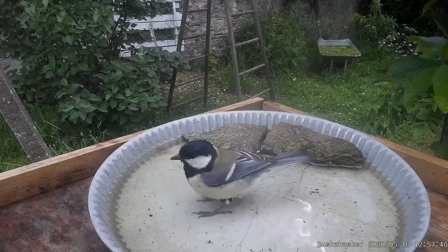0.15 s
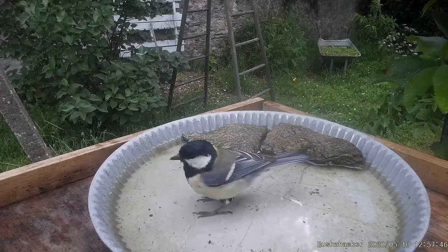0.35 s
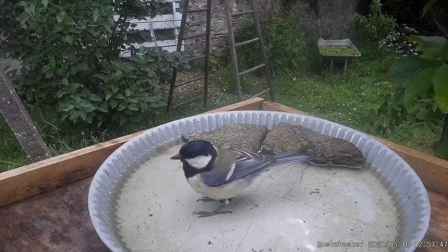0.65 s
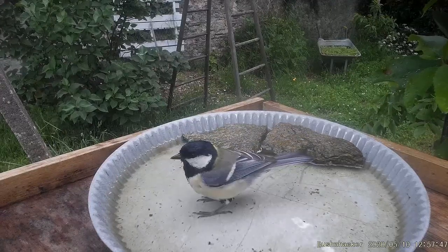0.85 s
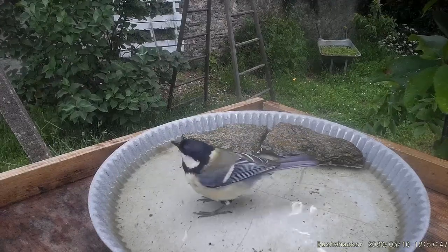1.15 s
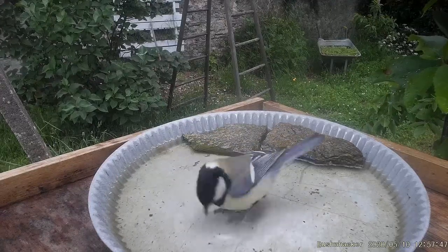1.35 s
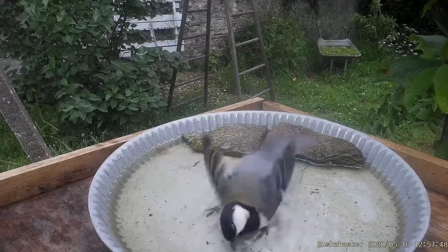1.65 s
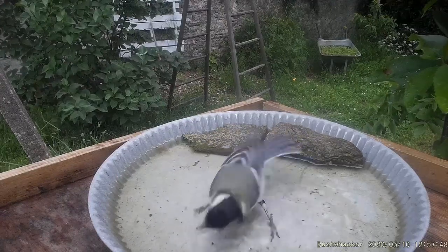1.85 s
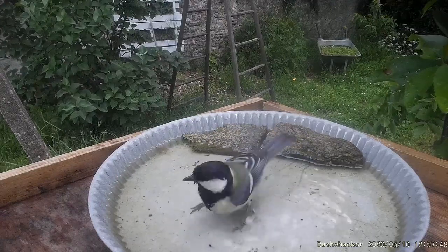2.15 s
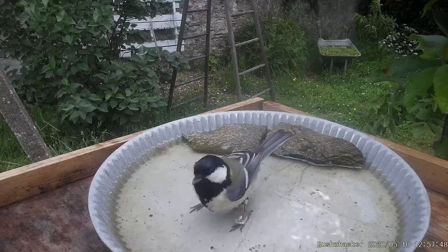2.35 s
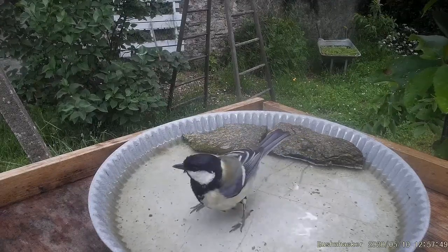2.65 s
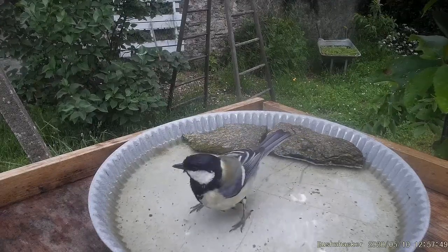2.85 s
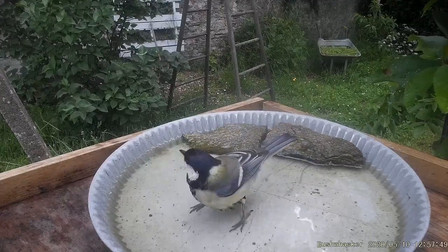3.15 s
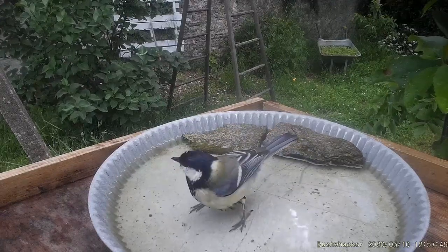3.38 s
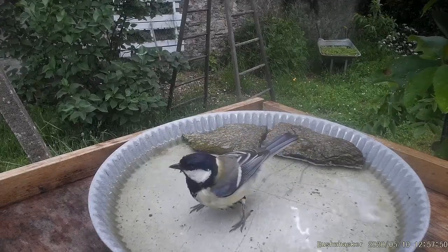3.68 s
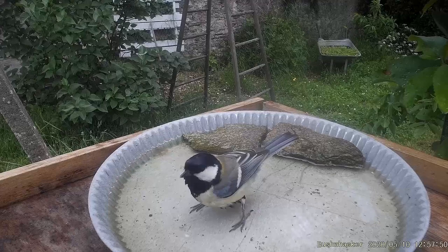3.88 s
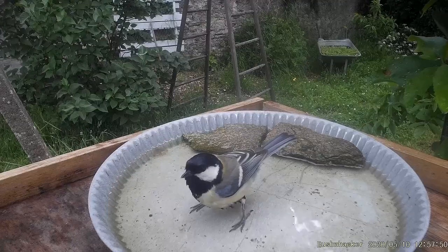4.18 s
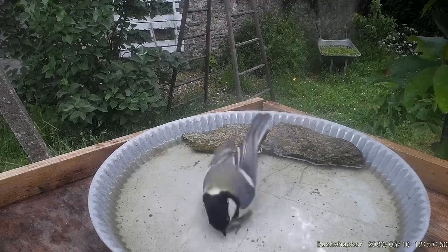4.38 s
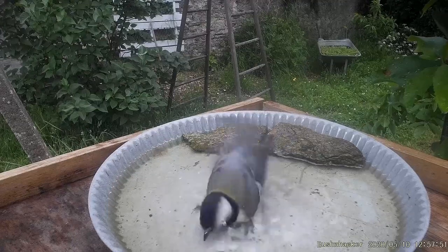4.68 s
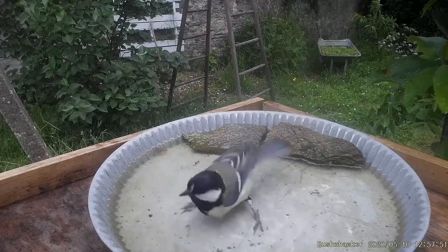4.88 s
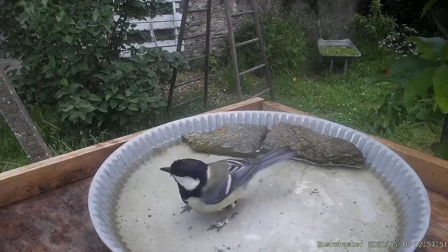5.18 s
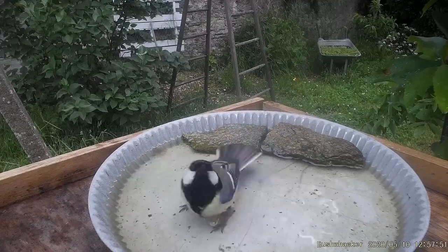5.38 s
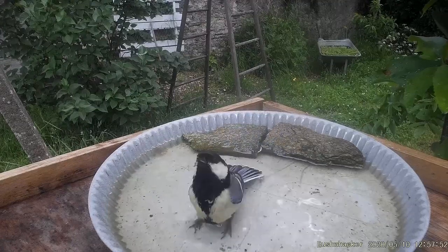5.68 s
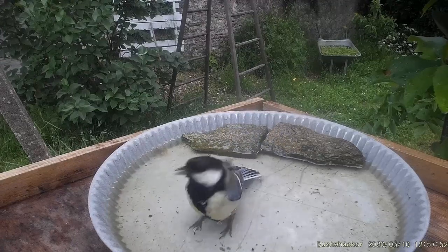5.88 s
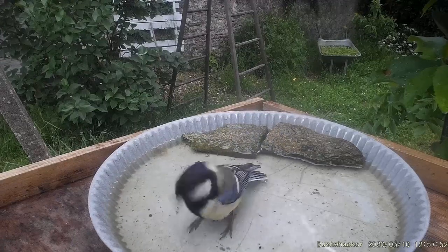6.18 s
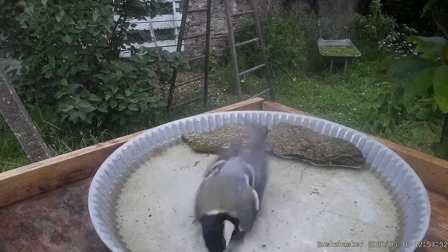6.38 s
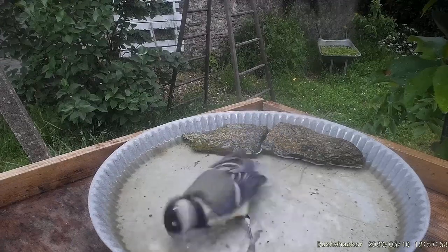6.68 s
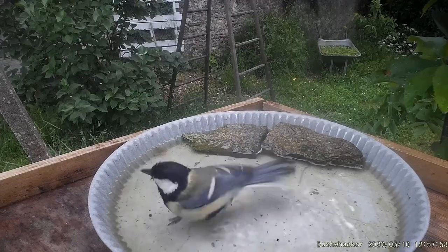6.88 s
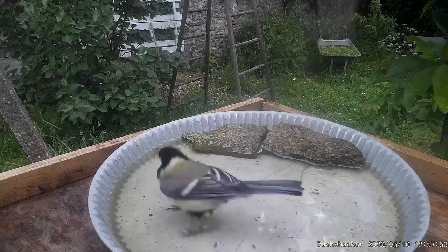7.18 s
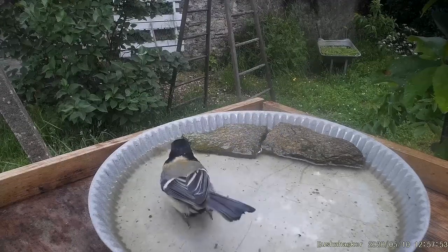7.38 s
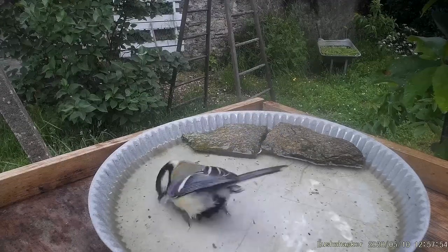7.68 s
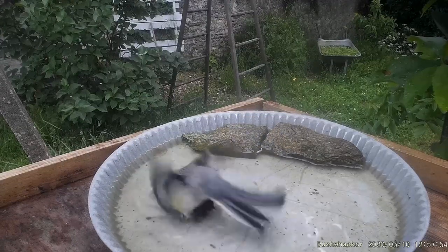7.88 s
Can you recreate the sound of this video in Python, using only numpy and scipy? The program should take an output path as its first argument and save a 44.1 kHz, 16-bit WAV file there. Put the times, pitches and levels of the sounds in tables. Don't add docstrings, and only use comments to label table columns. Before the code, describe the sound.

A small bird bathes close by, claws scraping and ringing a shallow dish, feet slapping water, wet wings spraying, faint birds calling far off.

```python
import sys
import numpy as np
from scipy import signal
from scipy.fft import rfft, irfft
from scipy.io import wavfile
from scipy.ndimage import uniform_filter1d

SR = 44100
rng = np.random.default_rng(int(sys.argv[2]) if len(sys.argv) > 2 else 0)


def materialize(psi):
    bounded = np.clip(np.atleast_2d(psi).T, -1, 1)
    quanta = np.round(bounded * 32767).astype(np.int16)
    wavfile.write(sys.argv[1], SR, quanta)


def invert_db(x):
    u = np.asarray(x, float) / 20
    return 10 ** u


N = 354563


def evened(x):
    return x / np.sqrt(np.mean(x ** 2) + 1e-20)


def peaked(x):
    return x / (abs(x).max() + 1e-20)


def add(mix, s, sound):
    part = mix[round(s * SR):][:len(sound)]
    part += sound[:len(part)]


def curve(tables, col):
    t, out = np.arange(N) / SR, np.zeros(N)
    for rows in tables:
        rows = np.array(rows)
        inside = (t >= rows[0, 0]) * (t < rows[-1, 0])
        out += invert_db(np.interp(t, rows[:, 0], rows[:, col])) * inside
    return uniform_filter1d(out, size=300)


def resonate(x, hz, width):
    r = np.exp(-np.pi * width / SR)
    return 2 * signal.lfilter([1 - r], [1, -r * np.exp(2j * np.pi * hz / SR)], x).real


def colour(x, points):
    hz, db = np.transpose(points)
    f = np.fft.rfftfreq(len(x), 1 / SR) + 1
    gain = invert_db(np.interp(np.log(f), np.log(hz), db))
    return evened(irfft(rfft(x) * gain, len(x)))


def high(x, hz):
    return signal.sosfilt(signal.butter(2, hz, "high", fs=SR, output="sos"), x)


def bursts(count):
    return np.arange(6000) / SR, rng.standard_normal((count, 6000))


def swells(rows):
    noise = rng.standard_normal((len(rows), 2600))
    u = np.arange(2600) / SR / np.array(rows)[:, 1:2]
    return noise * np.sin(np.pi * np.minimum(u, 1) ** 0.62) ** 2.5


def dying(t, t60, rise):
    return (1 - np.exp(-t / rise)) * invert_db(-60 * t / max(t60, .002))


def held(t, t60, hold):
    return dying(t, t60, 0.0016) / (1 + (t / hold) ** 6)


def mode(t, hz, t60, rise):
    return peaked(np.sin(2 * np.pi * hz * t) * dying(t, t60, rise))


def wander(hz):
    return evened(resonate(rng.standard_normal(N), hz, 1.19 * hz))


def echoes(x, t60):
    t = np.arange(round(.4 * SR)) / SR
    sparse = rng.choice([-1., 1.], len(t)) * (rng.random(len(t)) < .05)
    taps = sparse * invert_db(-60 * t / t60) * (t > .004)
    return signal.oaconvolve(x, taps / np.linalg.norm(taps))[:N]


# (pitch [Hz], width [Hz], level [dB])
DISH = [(1755, 77, -6), (2460, 36, -12.5), (3060, 17, -12.5), (3264, 134, -5), (3440, 39, -6),
        (4030, 13, -31.5), (4290, 42, -14.5), (5080, 140, -16), (4580, 270, -6), (5780, 930, -0.5),
        (6150, 37, -17), (6870, 54, -11), (7800, 250, -7.5), (8100, 120, -6.5)]
DISH_OCTAVES = np.log2(np.array(DISH)[:, 0] / 1800)


def dish(x, spot_db):
    shifts = 1 + 0.015 * rng.standard_normal(len(DISH))
    modes = 0
    for k, (hz, width, db) in enumerate(DISH):
        ringing = resonate(x, hz * shifts[k], 2.58 * width) / np.sqrt(width / 60)
        modes = modes + (-1) ** k * invert_db(db + spot_db[k]) * ringing
    return evened(modes) + 0.5 * evened(resonate(high(x, 490), 3100, 3500))


# (time [s], peak [dB], lowest dish ring [dB], rim squeak [dB re peak])
CLAWS = [(0.3735, -34, -60, -22), (0.385, -18.5, -53, -17), (0.4209, -12, -29, -28),
         (0.4314, -20, -29.5, -16), (0.4445, -24, -51, -8), (0.463, -21, -59, -7), (0.4802, -40, -69, 8),
         (1.3374, -37, -42, -30), (3.4092, -26.5, -56.5, -32), (3.4264, -32, -48.5, -8),
         (3.4545, -22.5, -45, -25), (3.4805, -25, -41.5, -28), (3.5006, -18.5, -32.5, -18),
         (3.5154, -18.5, -37, -7), (3.5224, -24, -36.5, -7), (3.5482, -23, -56, -32),
         (3.5535, -8.5, -37, -43), (3.5644, -17, -33, -3), (3.6117, -33.5, -51, -22),
         (3.6541, -38, -53, -18), (3.696, -34.5, -58.5, -22), (3.7589, -43, -54.5, -28),
         (4.0614, -31.5, -64, -21), (4.0774, -33, -66, -8), (4.0894, -42, -56, -15),
         (4.1305, -45, -48, -19), (4.9197, -35, -49, -15), (4.9344, -41, -45.5, -25)]
CLAWS_AND_BEAK = CLAWS + [(4.955, -20.5, -36, -12), (4.963, -20, -31, 6.5), (4.979, -28.5, -34, -13)]


def claws():
    out, (t, noise) = np.zeros(N), bursts(count=len(CLAWS_AND_BEAK))
    spots_db = 4.0 * rng.standard_normal((len(noise), len(DISH)))
    for (s, db, _, squeak_db), n, spot_db in zip(CLAWS_AND_BEAK, noise, spots_db):
        scratch = n * dying(t, 0.026, 0.00012)
        squeak = 1.3 * resonate(scratch, 8050, 600)
        squeak += .6 * resonate(scratch, 6600, 900) + .7 * resonate(scratch, 4300, 500)
        dull_db = 0.14 * (db + 17.0) * DISH_OCTAVES
        body = peaked(dish(scratch, spot_db + dull_db))
        add(out, s, invert_db(db - 4.0) * (body + invert_db(squeak_db) * peaked(squeak)))
    return out


# (time [s], level [dB])
DRAGS = [
    [(.37, -48), (.42, -65), (.43, -42), (.48, -49), (.56, -63)],
    [(3.39, -62), (3.45, -49), (3.505, -32.5), (3.54, -47), (3.57, -34), (3.6, -52), (3.71, -60)],
    [(4.045, -59), (4.07, -61), (4.11, -59), (4.18, -54.5)],
    [(4.89, -71), (4.94, -43), (4.95, -53), (4.97, -43), (5.0, -70)],
]


def drags():
    roughness = evened(uniform_filter1d(rng.standard_normal(N), size=250))
    slips = rng.standard_normal(N) * invert_db(6 * roughness)
    tilt_db = -1 * DISH_OCTAVES
    return curve(DRAGS, col=1) * evened(dish(slips, tilt_db))


# (start [s], length [s], peak [dB], favoured pitch
# [Hz])
SKIDS = [(0.365, 0.024, -48, 4500), (0.435, 0.014, -21.5, 6640), (0.447, 0.025, -33, 1800),
         (0.526, 0.0054, -43.5, 7200), (3.432, 0.018, -38.5, 1800), (3.472, 0.03, -30.5, 1830),
         (3.5, 0.012, -19, 4550), (3.512, 0.011, -18.5, 3380), (3.545, 0.02, -18.5, 3830),
         (3.576, 0.012, -39, 4600), (3.636, 0.0096, -43, 1800), (3.682, 0.0058, -40, 1490),
         (4.898, 0.026, -42.5, 2400), (4.916, 0.014, -43, 4500), (4.928, 0.016, -35.5, 3400),
         (4.962, 0.0075, -21.5, 4250), (4.963, 0.003, -11, 8100), (4.97, 0.0083, -32, 8100),
         (1.338, 0.027, -35, 4600), (4.059, 0.019, -32, 4220), (4.069, 0.053, -35.5, 1820)]


def skids():
    out, reach = np.zeros(N), 0.36
    for (s, _, db, hz), puff in zip(SKIDS, swells(SKIDS)):
        spot_db = [-7.0 * min(abs(np.log2(row[0] / hz)) / reach, 2) for row in DISH]
        add(out, s, invert_db(db) * peaked(dish(puff, spot_db)))
    return out


# (time [s], board ring [dB], dull thud [dB], dish ring [dB])
KNOCKS = [(0.425, -47, -24.5, -60), (1.322, -43.5, -34.5, -50), (1.452, -43.5, -35.5, -41.5),
          (1.696, -68, -38, -54), (2.178, -55.5, -36, -54.5), (3.334, -79, -57, -62.5),
          (3.408, -74, -49, -69), (3.503, -39.5, -29, -55), (4.038, -75, -46, -52.5),
          (4.079, -57, -35.5, -67), (4.53, -68, -55, -65), (4.796, -55, -61, -54), (4.959, -45.5, -50, -55),
          (5.134, -53, -46, -52), (5.161, -38.5, -17, -39.5), (5.705, -61, -42.5, -62.5),
          (6.365, -42, -37.5, -55), (6.432, -44, -44, -67), (6.44, -30.5, -32, -48.5),
          (6.51, -32.5, -30, -42.5), (6.976, -50.5, -46, -67), (7.31, -59, -48, -59),
          (7.641, -60, -54, -79), (7.773, -53, -44, -56), (7.831, -51, -36, -57),
          (7.984, -41.5, -32.5, -47.5)]
# (pitch [Hz], level [dB re thud])
BOARD_UPPER = [(1150, -23.5), (1500, -13), (1950, -13.5), (2350, -13)]


def knocks():
    out, (t, noise) = np.zeros(N), bursts(count=len(KNOCKS))
    board_hz, board_t60 = 445, 3.43 * 0.037
    for (s, db, thud_db, _), n in zip(KNOCKS, noise):
        shove = n * held(t, 0.054, 0.098)
        thud = peaked(resonate(high(shove, 340), 670, 3100))
        for hz, part_db in BOARD_UPPER:
            thud += invert_db(part_db) * peaked(resonate(shove, hz, 57))
        board = np.sin(2 * np.pi * board_hz * t) * held(t, board_t60, 0.03)
        add(out, s, invert_db(db) * board + invert_db(thud_db) * peaked(thud))
    return out


# (start [s], length [s], gain [dB])
RING_MUTES = [(0.48, 0.1, -18), (3.532, 0.034, -0.5), (1.362, 0.078, -19), (1.482, 0.052, -24),
              (7.858, 0.066, -6), (3.5, 0.016, -18), (4.15, 0.037, -34), (3.775, .07, -12),
              (3.6, 0.018, -10), (1.8, 0.049, -10), (5.188, .06, -4), (5.2, .03, -10), (6.56, .05, -6)]


def ring():
    energy, t = np.zeros(N), np.arange(8000) / SR
    ring_hz, ring_t60 = 705, .135
    blows = [(row[0], row[2]) for row in CLAWS_AND_BEAK] + [(row[0], row[3]) for row in KNOCKS]
    shape = peaked(dying(t, ring_t60, 0.011) / (1 + (t / 0.19) ** 6))
    for s, db in blows:
        add(energy, s, (invert_db(db - 1.0) * shape) ** 2)
    for s, length, db in RING_MUTES:
        press = signal.windows.tukey(round(length * SR), .7)
        energy[round(s * SR):][:len(press)] *= invert_db(2 * db * press)
    swing = np.sqrt(abs(uniform_filter1d(energy, size=200)))
    hz = ring_hz * (1 + 0.011 * wander(10.5))
    return swing * np.sin(2 * np.pi * np.cumsum(hz) / SR) * invert_db(1.5 * wander(22.53))


# (time [s], peak [dB], cavity pitch [Hz], spatter [dB re peak])
SLAPS = [(1.321, -24, 1290, 2.5), (1.33, -29.5, 1350, -18), (1.3936, -25, 2450, 4.5),
         (1.409, -40, 3210, 20), (1.43, -36, 2460, -11), (1.4513, -18.5, 1238, -21),
         (1.694, -33.5, 2320, 9), (2.1533, -25, 2470, -15), (2.16, -12, 2590, -13), (4.796, -24, 3550, 8),
         (5.069, -32, 4670, -4), (5.137, -28, 2540, -6), (5.1614, -16, 2200, -7), (5.162, -24, 1173, -20),
         (5.195, -32, 2660, -8), (5.703, -41, 1455, -4), (6.366, -28.5, 2800, -11),
         (6.4386, -27, 2350, 10.5), (6.513, -36, 2370, -10), (6.9671, -29.5, 3160, 2),
         (6.98, -34, 1440, -15), (7.3034, -46, 960, -2), (7.771, -40, 3360, 16.5), (7.776, -55, 1240, -14),
         (7.837, -58, 1450, -20), (7.991, -61, 1150, -20), (7.8298, -27, 3020, -7),
         (7.9864, -28.5, 2106, -17)]


def slaps():
    out, (t, noise) = np.zeros(N), bursts(count=len(SLAPS))
    for (s, db, hz, spatter_db), n in zip(SLAPS, noise):
        t60 = 0.059 * (2200 / hz) ** 0.3
        struck = 2500 / hz * mode(t, hz, 0.7 * t60, 0.00015)
        gurgle = resonate(n * dying(t, t60, 0.0008), hz, 0.16 * hz)
        gurgle = .9 * peaked(resonate(gurgle, hz, 0.35 * hz))
        spatter = n * (dying(t, 0.004, .0001) + 0.22 * held(t, 1.5 * t60, 0.006))
        spatter = resonate(peaked(high(spatter, 820)), 3300, 7200)
        click = 0.91 * peaked(n * dying(t, 0.0011, .00005))
        add(out, s, invert_db(db - 13.5) * (struck + gurgle + invert_db(spatter_db) * spatter + click))
    return out


# (time [s],
# peak [dB], pitch [Hz])
DROPS = [(1.6624, -35.5, 6860), (1.726, -39, 3900), (1.786, -48, 4700), (1.827, -41.5, 3800),
         (2.179, -26.5, 4750), (2.333, -45, 3920), (4.616, -25.5, 6000), (4.796, -36, 7140),
         (4.864, -35, 8400), (4.9626, -13, 6460), (5.1324, -20, 2470), (5.414, -51.5, 2670),
         (2.985, -53, 6000), (3.033, -53, 5500), (3.667, -43, 6800), (5.676, -47, 8200),
         (6.2766, -45, 8100), (6.673, -39, 6460), (6.679, -44, 5350), (6.688, -40.5, 2930),
         (6.712, -44, 7200), (6.747, -56, 3530), (1.853, -49, 2200), (5.791, -50, 1940), (7.585, -57, 1720),
         (6.791, -49, 2240), (6.954, -30.5, 7840), (7.129, -48.5, 5600), (7.3277, -31, 6870),
         (7.721, -47.5, 6960), (7.9009, -30.5, 4580), (7.9249, -47, 6360), (7.975, -50, 2000)]
# (time [s], peak [dB], pitch [Hz])
FLUNG = [(1.295, -58, 2530), (1.443, -47, 4500), (2.102, -55, 8600), (2.277, -63, 9500), (2.246, -57, 2840),
         (2.302, -61, 3380), (2.389, -55, 2200), (2.5042, -54.5, 2420), (2.558, -54, 6950),
         (2.6415, -46, 3430), (3.257, -51, 2100), (3.257, -64, 1310), (3.395, -52.5, 2580),
         (3.835, -55.5, 5900), (4.0393, -45, 2500), (4.152, -51, 5500), (4.4106, -52, 7500),
         (4.508, -53, 8000), (4.5329, -40, 3160), (4.7205, -50, 10500), (4.741, -44, 7660),
         (5.811, -54, 5500), (6.49, -39.5, 7500), (6.568, -39, 7240), (6.6016, -48, 6170),
         (6.626, -46, 7860), (6.7, -47, 8900), (1.229, -61, 2000), (1.352, -50, 6500), (1.945, -57, 4460),
         (1.972, -61, 8000), (2.545, -53, 2600), (2.798, -58, 5500), (4.133, -68, 6460), (4.304, -56, 1480),
         (5.619, -56, 7240), (5.79, -56, 6450), (6.06, -67, 2800), (6.802, -54, 5670), (6.858, -51, 1800),
         (7.4569, -45, 11500), (7.953, -57, 7790), (8.022, -41.5, 7600)]


def drops():
    out, (t, noise) = np.zeros(N), bursts(count=len(DROPS + FLUNG))
    ticks_db = [-7.5] * len(DROPS) + [13] * len(FLUNG)
    for (s, db, hz), tick_db, n in zip(DROPS + FLUNG, ticks_db, noise):
        bubble = np.sin(2 * np.pi * hz * t * (1 + 4.3 * t)) * dying(t, 45 / hz, 0.000067)
        tick = resonate(high(n * dying(t, .005, .00015), .7 * hz), hz, 4500)
        add(out, s, invert_db(db - 1.5) * (peaked(bubble) + invert_db(tick_db) * peaked(tick)))
    return out


# (start [s], length [s], peak [dB], pitch [Hz])
FLICKS = [(2.162, 0.011, -35, 7640), (2.173, 0.006, -31, 2630), (2.272, 0.0053, -52, 9000),
          (2.3, 0.0089, -47, 4200), (2.313, 0.005, -47, 3900), (2.394, 0.01, -51, 4300),
          (4.501, 0.016, -42, 11000), (4.661, 0.01, -42, 7600), (4.702, 0.0082, -43, 7100),
          (4.632, .014, -40, 8440), (4.777, 0.0042, -55, 7500), (5.076, 0.027, -46, 9000),
          (5.125, 0.011, -45, 7950), (5.139, 0.019, -30.5, 7000), (5.164, 0.012, -27.5, 7600),
          (5.186, 0.011, -44, 7000), (5.216, .012, -48, 7500), (6.281, 0.0096, -50, 8550),
          (6.286, 0.016, -47.5, 7900), (6.287, 0.021, -52, 1820), (6.378, 0.02, -39, 2230),
          (6.386, 0.013, -45, 8000), (6.419, .008, -43, 8000), (6.429, 0.0042, -47, 3000),
          (6.448, 0.02, -39, 9000), (6.504, 0.012, -33, 3200), (6.52, .025, -40, 7500),
          (6.575, .008, -50, 8500), (6.935, 0.0053, -51, 10000), (6.952, 0.0072, -45, 4020),
          (6.965, 0.012, -36.5, 8100), (6.951, 0.052, -49, 1800), (6.982, 0.007, -44, 2400),
          (5.691, 0.017, -42.5, 7500), (7.062, 0.0073, -47, 8850), (7.188, .012, -51, 8900),
          (7.296, 0.014, -42.5, 9200), (7.476, 0.0075, -52, 7040)]


def flicks():
    out = np.zeros(N)
    for (s, _, db, hz), puff in zip(FLICKS, swells(FLICKS)):
        add(out, s, invert_db(db) * peaked(resonate(high(puff, 0.06 * hz), hz, 0.4 * hz)))
    return out


# (start [s], length [s], spray [dB], slosh [dB re spray])
SPRAY = [(1.368, 0.16, -64, -0.5), (1.693, 0.22, -55.5, -8.5), (2.157, 0.011, -59, 1),
         (4.524, 0.17, -54, -13), (4.737, 0.18, -53.5, -13), (5.088, 0.12, -52.5, -8),
         (5.377, 0.04, -62, -9.5), (6.45, 0.1, -50.5, -5), (6.62, 0.15, -55, -6), (6.89, 0.015, -62.5, -20),
         (6.974, 0.019, -63.5, 2.5), (7.318, 0.0072, -63.5, 3.5), (7.935, 0.68, -52, -10.5)]


def shakes():
    rise_s, fall_s, sag_db, edge_db = 0.12, 0.07, -3.5, -18.5
    tables = []
    for s, length, db, slosh_db in SPRAY:
        points = [(-min(rise_s, length), edge_db), (0, 0), (length, sag_db), (length + fall_s, edge_db)]
        tables.append([(s + at, db + off_db, db + off_db + slosh_db) for at, off_db in points])
    return tables


# (frequency [Hz], level [dB per Hz])
SPRAY_COLOUR = [(1500, 0), (2500, 3), (3500, 6.5), (5000, 2.5), (7600, 9.5), (9500, 0.5), (12500, -8),
                (16000, -10)]
# (frequency [Hz], level [dB per Hz])
SLOSH_COLOUR = [(150, -62), (300, -1), (1000, -13), (3000, -6.5), (5000, -31.5)]


def spray():
    grains_per_s, landing_s = 2500, .0004
    sizes = invert_db(4.2 * np.minimum(rng.exponential(1, (2, N)), 3.8))
    sizes = sizes * (rng.random((2, N)) < grains_per_s / SR)
    landing = signal.filtfilt([1], [1, -np.exp(-1 / (landing_s * SR))], sizes, axis=1)
    landing = landing / (landing_s * SR)
    ticks = (landing + 0.55) * rng.standard_normal((2, N))
    beats = invert_db(1.9 * wander(20))
    drizzle = curve(shakes(), col=1) * colour(ticks[0], SPRAY_COLOUR)
    slosh = curve(shakes(), col=2) * colour(ticks[1], SLOSH_COLOUR)
    return beats * (drizzle + slosh)


def glide(mix, s, hz, gain):
    add(mix, s, gain * np.sqrt(2) * np.sin(2 * np.pi * np.cumsum(hz) / SR))


# (time after start [s], pitch [Hz], level [dB])
CHIRP = [(0, 4500, -9), (.007, 4620, 2), (.022, 4560, 1), (.036, 3507, 3), (.047, 4140, -1),
         (.053, 3900, -18), (.062, 3250, -1), (.072, 3620, 0), (0.105, 2800, -10)]
# (time [s], level [dB])
SPARROW = [(.46, -62), (1.177, -65.5), (1.792, -61.5), (2.603, -63), (3.127, -65), (3.79, -63), (4.43, -64),
           (5.732, -63), (7.353, -63)]


def sparrow(out, quiver):
    at, hz, db = np.transpose(CHIRP)
    t = np.arange(0, at[-1], 1 / SR)
    for s, level_db in SPARROW:
        pitch = np.interp(t, at, hz) * rng.uniform(0.96, 1.01) + 80 * quiver[round(s * SR):][:len(t)]
        gain = invert_db(level_db + 3 + np.interp(t, at, db)) * signal.windows.tukey(len(t), .1)
        glide(out, s, pitch, gain)


# (start [s], end [s], start pitch [Hz], end
# pitch [Hz], level [dB])
WHISTLES = [(4.3, 4.388, 6450, 5900, -74), (0.665, 0.72, 3400, 4200, -68), (2.66, 2.78, 7900, 7000, -74),
            (2.48, 2.6, 8600, 7200, -76), (4.2, 4.26, 5440, 5530, -73), (4.535, 4.585, 3330, 3250, -55.5),
            (4.61, 4.665, 2900, 3230, -58.5), (4.1, 4.19, 3350, 3200, -66), (3.93, 3.99, 3400, 3200, -68),
            (4.41, 4.47, 3000, 3350, -65), (2.92, 2.95, 3400, 3200, -71), (3.11, 3.13, 3750, 3700, -70),
            (3.96, 4.04, 4340, 5280, -67), (5.012, 5.042, 2400, 2560, -59), (6.03, 6.14, 7450, 7100, -76),
            (5.91, 5.99, 8100, 7900, -77), (4.838, 4.85, 3300, 3400, -57), (6.23, 6.261, 4000, 4560, -65),
            (7.33, 7.41, 7450, 7350, -71), (7.46, 7.56, 7600, 7100, -75), (7.715, 8.057, 9200, 8000, -67)]


def whistles(out, quiver):
    for s, end, start_hz, end_hz, level_db in WHISTLES:
        u = np.linspace(0, 1, round((end - s) * SR))
        pitch = start_hz + (end_hz - start_hz) * u ** 0.75 + 60 * quiver[-len(u):]
        glide(out, s, pitch, invert_db(level_db) * signal.windows.tukey(len(u), .4))


# (start [s], end [s], level [dB])
DOVE = [(.68, 0.836, -74), (1.02, 1.213, -82), (3.1, 3.302, -82), (4.2, 4.346, -74), (4.42, 4.57, -86),
        (5.8, 5.96, -74), (6.08, 6.303, -80), (7.4, 7.56, -75)]


def dove(out):
    for s, end, level_db in DOVE:
        u = np.linspace(-1, 1, round((end - s) * SR))
        glide(out, s, 500 * (1 - 0.052 * u ** 2), invert_db(level_db) * np.cos(np.pi * u / 2))


# (start [s], end [s], level [dB])
HONKS = [(0.534, 0.65, -91), (1.506, 1.623, -88), (2.604, 2.805, -90), (5.427, 5.64, -88.5),
         (7.422, 7.658, -92)]
HONK_PARTIALS_DB = [14, 14, 6]


def farm_bird(out):
    for s, end, level_db in HONKS:
        u = np.linspace(-1, 1, round((end - s) * SR))
        for k, part_db in enumerate(HONK_PARTIALS_DB, 1):
            glide(out, s, k * 677 * (1 - 0.0023 * u), invert_db(level_db + part_db) * np.cos(np.pi * u / 2))


def far_birds():
    out, quiver = np.zeros(N), wander(88)
    sparrow(out, quiver)
    whistles(out, quiver)
    dove(out)
    farm_bird(out)
    out = out * invert_db(3 * wander(30))
    return .58 * out + .65 * echoes(out, t60=.3)


# (time [s], level [dB])
CHATTER = [(0, -72), (.3, -71.5), (.9, -81), (1.3, -108), (2.1, -105), (2.6, -71.5), (3.2, -77), (3.9, -61),
           (4.4, -71.5), (5.3, -74.5), (6.0, -77.5), (7.1, -94), (7.5, -71.5), (8.04, -90)]


def chatter():
    hz = np.fft.rfftfreq(512, 1 / SR)[:, None]
    a, b, patches = rng.standard_normal((N // 128 + 5, 257, 3)).T
    patches = uniform_filter1d(uniform_filter1d(patches, size=3, axis=0), size=14, axis=1)
    band = np.exp(-((hz - 3600) / 900) ** 2) + 0.25 * np.exp(-((hz - 6300) / 1800) ** 2)
    cells = (a + 1j * b) * band * invert_db(3.2 * evened(patches))
    sound = signal.istft(cells, nperseg=512, noverlap=384)[1][:N]
    return invert_db(np.interp(np.arange(N) / SR, *np.transpose(CHATTER))) * evened(sound)


# (time [s], peak [dB], loss either side [dB/s])
WIND = [(.47, -62, 93), (1.8, -66, 28), (3.1, -65, 82), (3.52, -48.5, 124), (4.08, -62.5, 79),
        (4.75, -67, 25), (5.1, -54.5, 78), (6.55, -67, 14.5), (7.95, -65.5, 39)]


def wind():
    t, breeze_db = np.arange(N) / SR, -73
    rumble = colour(rng.standard_normal(N),
                    [(8, -21.5), (22, 4.0), (50, -4), (110, -7.0), (300, -18.5), (900, -34.5)])
    gusts = sum(invert_db(db - fade_db * abs(t - s)) for s, db, fade_db in WIND)
    after = t - 5.087
    puff = -invert_db(-34) * np.cos(2 * np.pi * 33 * after) * np.exp(-(after / 0.0098) ** 2)
    return (invert_db(breeze_db) + gusts) * rumble + puff


# (frequency [Hz], level [dB per Hz])
AIR = [(59, -20), (100, -6.5), (400, -7), (558, -9.5), (1400, -13.5), (4020, -13.5), (5530, -11.5),
       (16000, -23.5)]


def air():
    return invert_db(-65.5 + 0.92 * wander(0.49)) * colour(rng.standard_normal(N), AIR)


def whine():
    return invert_db(-85.5) * np.sin(2 * np.pi * 13599 * np.arange(N) / SR)


def scene():
    blows = claws() + drags() + skids() + knocks() + ring() + slaps() + drops()
    bath = signal.lfilter(*signal.butter(3, 9800, fs=SR), blows) + spray()
    bath = bath + signal.lfilter(*signal.butter(2, 12000, fs=SR), flicks())
    background = chatter() + wind() + air() + whine()
    return (bath + invert_db(-19.5) * echoes(bath, t60=0.2) + far_birds() + background)[None]


def low_pass(x):
    return signal.sosfilt(signal.butter(12, 16430, fs=SR, output="sos"), x)


def record(dry):
    edge = signal.firwin(301, 15900, window=("kaiser", 9), fs=SR)
    mix = signal.oaconvolve(dry, edge[None], "same")
    return low_pass(mix)


dry = scene()
out = record(dry)
materialize(out)
```